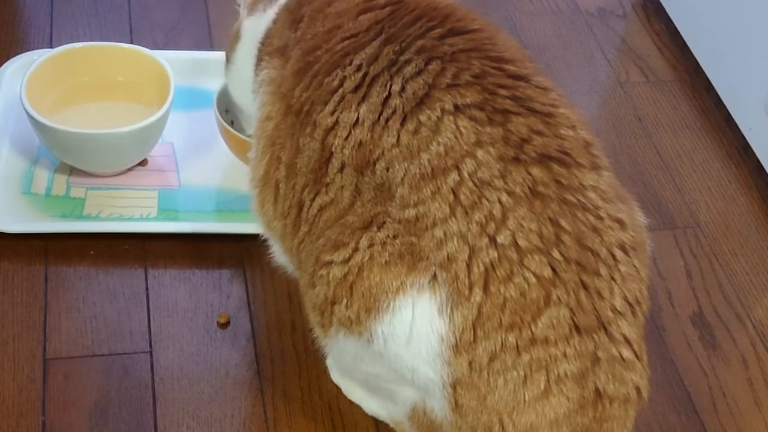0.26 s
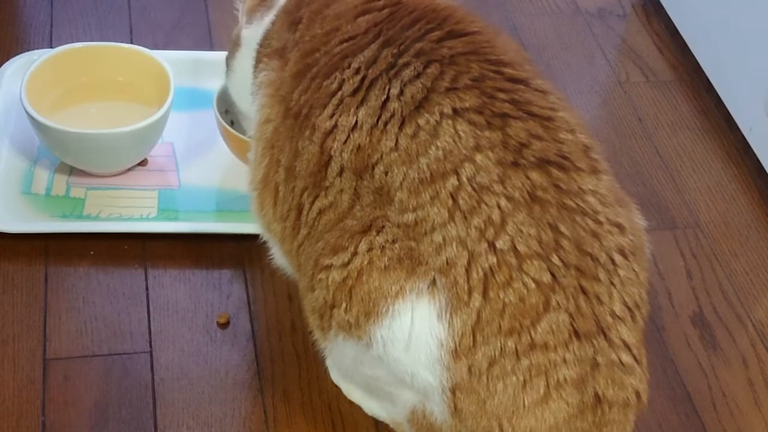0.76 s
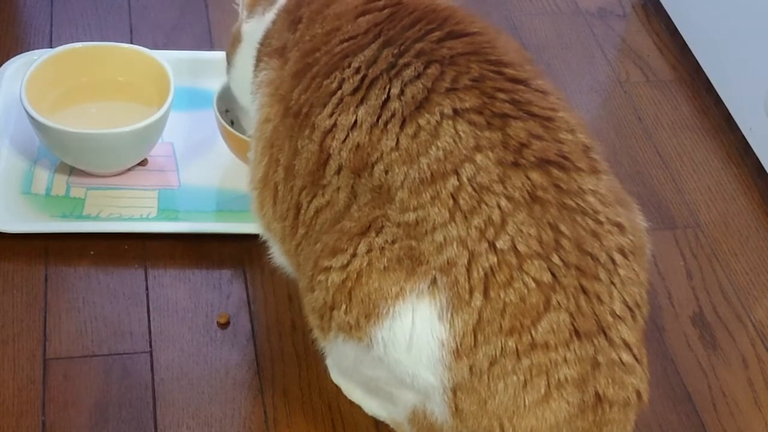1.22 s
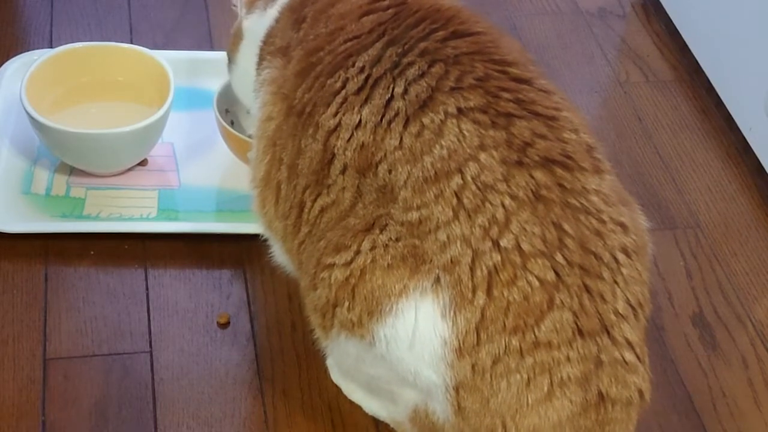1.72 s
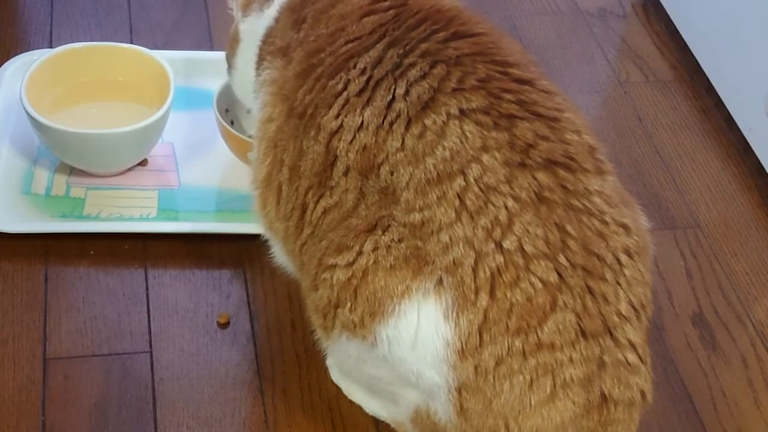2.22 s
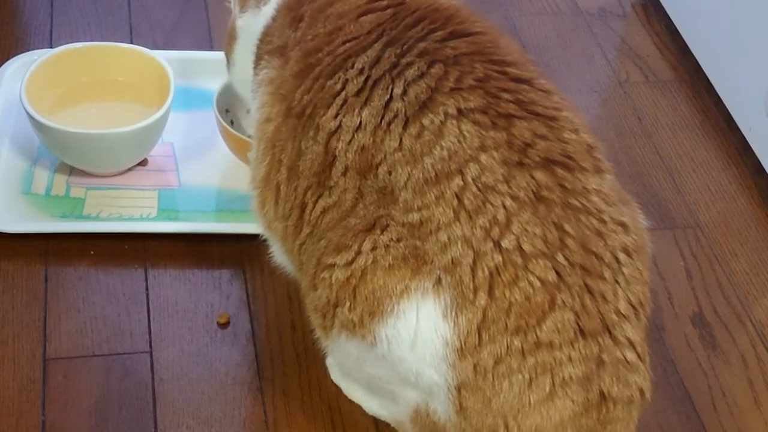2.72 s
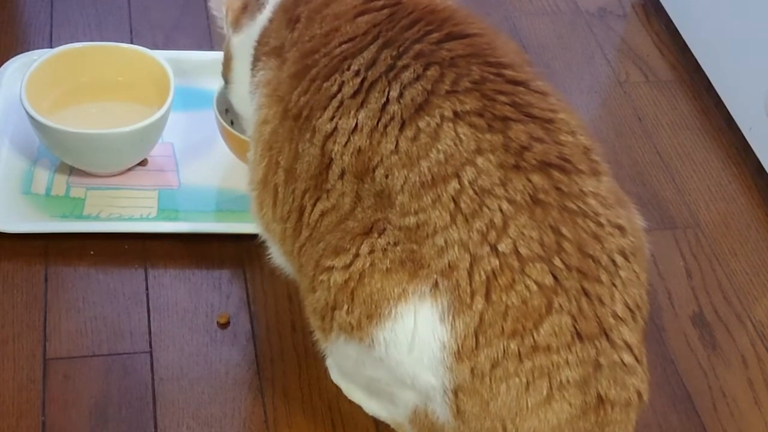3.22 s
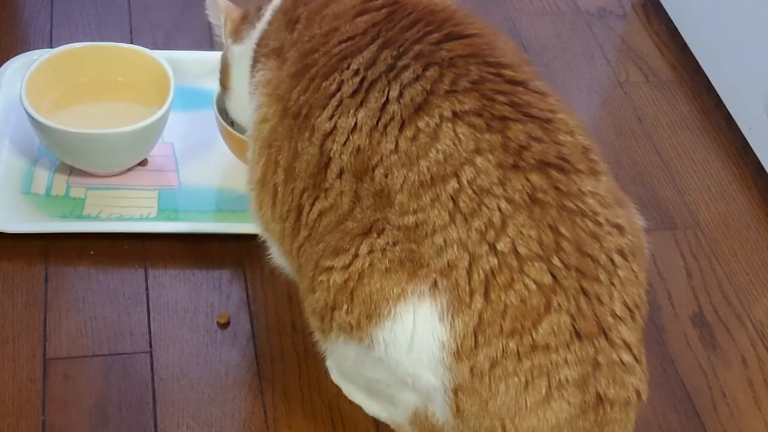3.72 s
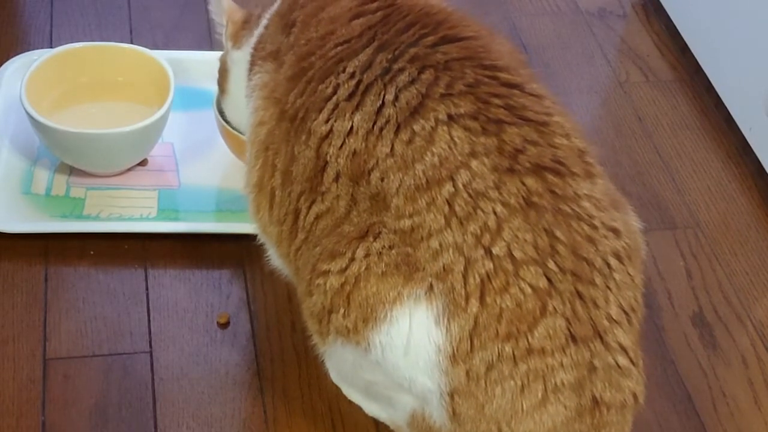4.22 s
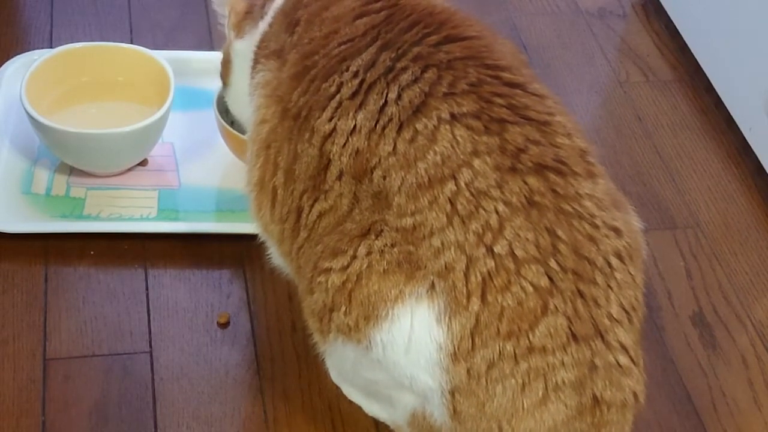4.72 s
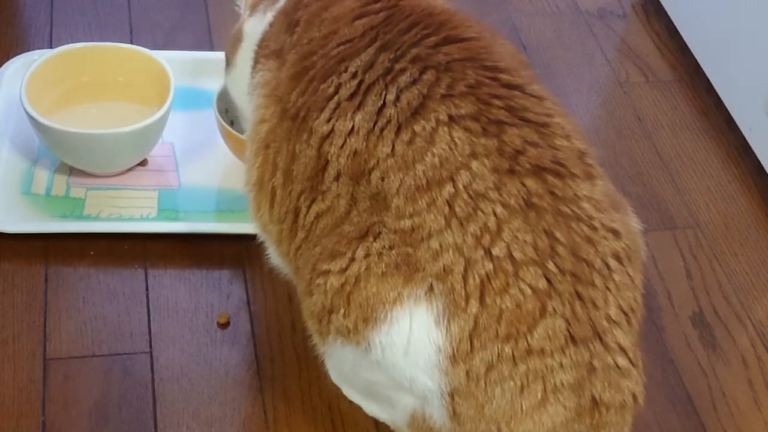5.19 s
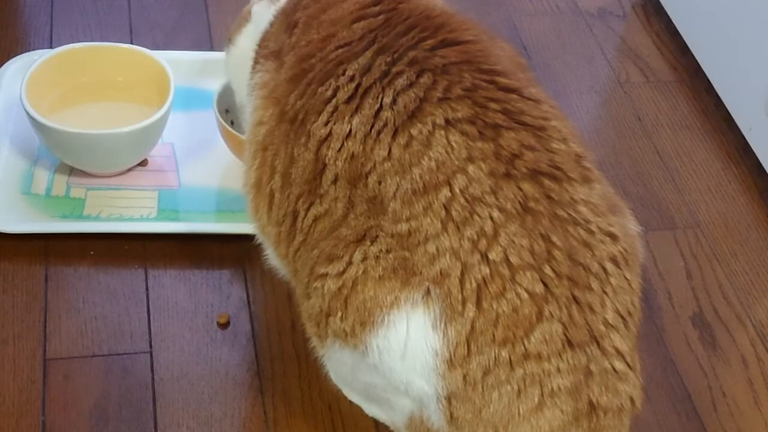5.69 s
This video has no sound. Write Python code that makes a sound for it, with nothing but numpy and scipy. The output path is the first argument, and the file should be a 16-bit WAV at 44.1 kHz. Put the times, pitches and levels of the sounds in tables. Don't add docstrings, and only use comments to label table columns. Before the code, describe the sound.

A cat eats hard pieces from a small bowl on a tray in a bare, lively room with a wooden floor. Brittle crunches, little ceramic clicks and crumb ticks come irregularly with dull tray knocks and rubbing. After about four seconds it thins out, then something drops hard and bounces quickly, followed by faint scrapes and ticks. Low mains hum and room air run beneath; close small stereo microphones.

```python
import sys
import numpy as np
from scipy import signal
from scipy.fft import rfft, irfft, next_fast_len
from scipy.io import wavfile
from scipy.ndimage import uniform_filter1d

SR = 44100
rng = np.random.default_rng(int(sys.argv[2]) if len(sys.argv) > 2 else 0)


def gain_from_decibels(decibels):
    exponent = np.asarray(decibels, float) / 20
    return 10 ** exponent


def materialize(psi):
    bounded = np.clip(np.atleast_2d(psi).T, -1, 1)
    quanta = np.round(bounded * 32767).astype(np.int16)
    wavfile.write(sys.argv[1], SR, quanta)


N = 262395
EDGES = 35 * 2 ** np.arange(0, 9.1, .5)
LEFT_LAG = 18


def rms_one(x):
    return x / np.sqrt(np.mean(x ** 2) + 1e-20)


def at_hz(points, hz):
    table_hz, value = np.array(points)[:, 0], np.array(points)[:, 1]
    return np.interp(np.log(hz), np.log(table_hz), value)


def band(x, low_hz, high_hz):
    sos = signal.butter(2, [low_hz, min(high_hz, .45 * SR)], "band", fs=SR, output="sos")
    return signal.sosfilt(sos, x + 1e-18)


def low_pass(x, hz):
    return signal.sosfilt(signal.butter(4, hz, fs=SR, output="sos"), x + 1e-18)


def resonance(x, hz, width_hz):
    r = np.exp(-np.pi * width_hz / SR)
    feedback = [1, -2 * r * np.cos(2 * np.pi * hz / SR), r * r]
    return signal.lfilter([(1 - r * r) / 2, 0, (r * r - 1) / 2], feedback, x)


def narrow(x, hz, width_hz):
    return rms_one(resonance(resonance(x, hz, width_hz), hz, width_hz))


def drift(rate):
    return np.interp(np.arange(N) * rate / SR, np.arange(200), rng.standard_normal(200))


def alike_pair(mid, side, hz):
    # (frequency [Hz], correlation [0-1])
    likeness = [(60, 0.77), (250, 0.69), (500, 0.6), (1000, 0.031), (4000, 0.074), (12000, 0.029)]
    # (frequency [Hz], left over right [dB])
    left_over_right = [(60, 3), (250, -1.5), (600, -4.5), (1300, -0.5), (2500, 6.5), (5000, 0.5),
                       (12000, 3.5)]
    alike = np.clip(at_hz(likeness, hz), 0, 1)
    lean_db = at_hz(left_over_right, hz) / 2
    shared, apart = np.sqrt(1 + alike) * mid, np.sqrt(1 - alike) * side
    return np.array([shared + apart, shared - apart]) * gain_from_decibels(np.array([[lean_db], [-lean_db]]))


def air():
    # (frequency [Hz], density [dB per Hz])
    air_colour = [(35, -7.5), (60, -4), (105, 7), (160, -16), (250, -9.5), (620, -12), (820, -29),
                  (1300, -41.5), (2200, -30.5), (3000, -22), (4800, -35), (6300, -49.5), (7800, -52),
                  (15500, -51.5)]
    # (frequency [Hz], width [Hz], level [dB])
    rumble_peaks = [(59, 4.1, -74.5), (107, 3.1, -72), (237.2, 12, -76.5)]
    air_db, patchy_db = -60, 2.2
    hum_hz, hum_db = 59.2, -61.5
    white, hiss = rng.standard_normal((2, 2, N)), 0
    for k, (low, high) in enumerate(zip(EDGES, EDGES[1:])):
        hz = np.sqrt(low * high)
        level = gain_from_decibels(at_hz(air_colour, hz) + patchy_db * drift(3.2))
        hiss = hiss + level * alike_pair(*band(white[k % 2], low, high), hz)
    rumble = sum(gain_from_decibels(db) * narrow(white[0, 0], hz, width) for hz, width, db in rumble_peaks)
    hum = gain_from_decibels(hum_db + 1.8 * drift(9.4)) * np.sin(2 * np.pi * hum_hz * np.arange(N) / SR)
    return gain_from_decibels(air_db - 6.0) * rms_one(hiss) + rumble + hum


def rubbing():
    # (time [s], level [dB])
    effort_curve = [(0.0, -75), (0.4, -60.5), (1.29, -53.5), (1.66, -62), (2.8, -58), (2.98, -45),
                    (3.45, -60), (3.66, -49), (3.98, -61.5), (4.46, -73.5), (4.72, -54.5), (5.19, -69.5),
                    (5.68, -75.5), (5.95, -63.5)]
    # (time [s], strength [dB], half length [s], boards over tray [dB])
    tray_shoves = [(.43, -40, 0.18, -23.5), (1.13, -44, 0.079, -42), (1.46, -50, 0.1, -34),
                   (2.4, -62.5, 0.32, -7.5), (2.95, -38.5, 0.057, -23), (3.456, -45.5, 0.025, -6.5),
                   (3.61, -38.5, 0.21, -14), (3.728, -51.5, 0.047, 9), (3.792, -37.5, 0.05, -7),
                   (4.94, -50, 0.15, -30), (5.88, -82, 0.047, -1)]
    mean_db = -59.5
    boards_db, tray_db, food_db, wet_shove_db = -6.5, 9, -7.5, -20.5
    boards_follow, food_follows = 0.93, 0.25
    t = np.arange(N) / SR
    effort_db = np.interp(t, *np.transpose(effort_curve)) - mean_db
    shoves, deep_shoves = 0, 0
    for s, db, half_s, low_db in tray_shoves:
        swell = gain_from_decibels(db) * np.clip(1 - np.abs(t - s) / half_s, 0, 1) ** 2
        shoves = shoves + swell
        deep_shoves = deep_shoves + swell * gain_from_decibels(low_db)
    boards = gain_from_decibels(mean_db + boards_db + boards_follow * effort_db) + deep_shoves
    tray = gain_from_decibels(mean_db + tray_db + effort_db) + shoves
    food = gain_from_decibels(mean_db + food_db + food_follows * effort_db) + gain_from_decibels(wet_shove_db) * shoves

    sizes = gain_from_decibels(2.7 * np.minimum(rng.exponential(1, (2, N)), [[2], [4]])) * rng.choice([-1, 1], (2, N))
    chance = np.array([[250], [900]]) * gain_from_decibels(4 * drift(25)) / SR
    slips, grains = sizes * (rng.random((2, N)) < chance)
    return (boards * gain_from_decibels(-0.5) * rms_one(band(slips, 69, 200))
            + tray * gain_from_decibels(-14.5) * rms_one(band(slips, 160, 1200))
            + food * gain_from_decibels(-5.5) * rms_one(band(grains, 1200, 9000)))


def slides():
    # (time [s], length [s], pitch [Hz], width [Hz], level [dB])
    singing_slides = [(1.132, 0.02, 1350, 300, -42), (1.144, 0.035, 1500, 280, -38),
                      (4.647, 0.049, 12000, 200, -65), (4.83, .07, 640, 170, -44),
                      (4.9, .06, 660, 170, -48), (4.856, 0.11, 1300, 1600, -49),
                      (5.085, .09, 2500, 400, -73), (5.175, 0.13, 2600, 450, -62),
                      (5.3, .1, 2550, 400, -65), (5.175, 0.11, 3450, 280, -66),
                      (5.175, 0.11, 4700, 2000, -57), (5.302, .04, 5300, 1000, -57),
                      (5.703, .075, 453, 35, -49.5), (5.74, 0.026, 398, 36, -48),
                      (5.78, 0.073, 367.5, 30, -52), (5.755, 0.093, 523, 23, -51),
                      (5.72, 0.06, 705, 39, -54)]
    sag = 0.97
    size = SR // 4
    out = np.zeros(N + SR)
    for s, length, hz, width_hz, db in singing_slides:
        slips = rng.standard_normal(size) ** 3
        along = np.arange(size) / SR / length
        stroke = np.clip(along * 12, 0, 1) * np.clip((1 - along) * 4, 0, 1)
        first, last = narrow(slips, hz, width_hz), narrow(slips, hz * sag, width_hz)
        out[round(s * SR):][:size] += gain_from_decibels(db) * stroke * (first * (1 - along) + last * along)
    return out[:N]


def knocks():
    # (time [s], peak [dB], ring [Hz])
    dull_knocks = [(0.258, -23.5, 334), (0.313, -39, 289), (0.468, -18, 381), (0.577, -63, 410),
                   (0.895, -47, 373), (1.026, -14.5, 355), (1.245, -55, 420), (1.349, -30, 436),
                   (1.958, -34.5, 116), (2.099, -49, 452), (2.357, -39, 114), (2.739, -35, 104),
                   (3.014, -31, 99.6), (3.07, -37, 101.5), (3.433, -18, 490), (3.572, -30.5, 101),
                   (3.705, -38.5, 116), (3.77, -38, 171), (4.127, -49, 121.3), (3.459, -28, 150),
                   (4.674, -34.5, 101), (0.599, -40, 112), (4.418, -31, 73.4), (4.856, -25, 246)]
    out, t = np.zeros(N + 8192), np.arange(8192) / SR
    for s, db, hz in dull_knocks:
        ring = np.sin(2 * np.pi * hz * t) * np.exp(-t * hz / 3.0)
        out[round(s * SR):][:8192] += gain_from_decibels(db - 16.0) * ring
    return out[:N]


def heavy_drop():
    # (time [s], level [dB])
    blows = [
        (4.4854, -16.5),
        (4.5035, -20.5),
        (4.528, -25),
    ]
    # (frequency [Hz], level [dB], t60 [s])
    board_modes = [(59.4, -2.5, 0.39), (85, 7.5, 0.14), (158, -9.5, 0.14), (200.7, -7.5, 0.042),
                   (226.4, -9.5, 0.2), (306, -14.5, .2), (401, -23, 0.14), (555, -11, 0.027),
                   (696, -16, 0.33)]
    out = 0
    for s, blow_db in blows:
        t = np.maximum(np.arange(N) / SR - s, 0)
        onset = 1 - np.exp(-t / 0.00061)
        for (hz, db, t60), lean_db in zip(board_modes, rng.normal(0, 1.3, len(board_modes))):
            level = gain_from_decibels(blow_db + db - 60 * t / t60 + lean_db * np.array([[1], [-1]]))
            out = out + level * np.sin(2 * np.pi * hz * t) * onset
    return out


def contacts():
    # (time [s], strength [dB], sharpness [dB], weight
    # on the tray [dB], ring [Hz])
    crunches = [(0.3146, -40, -13, -5.5, 2000), (0.6739, -35, -7, -15, 3180), (0.826, -50, -13, -6, 3280),
                (0.9858, -46.5, -16, -2, 2280), (1.0254, -36.5, -11.5, -2, 1630),
                (1.1308, -46.5, -9, -9, 1210), (1.2468, -34.5, -9, -9.5, 2380),
                (1.269, -36, -4.5, -8, 2300), (1.6505, -41, -6, -12.5, 2080), (2.146, -37.5, -16, -7, 2450),
                (2.172, -37.5, -1, -34, 1950), (2.443, -41.5, -13.5, -8.5, 2430),
                (2.5197, -31, -4, -13.5, 2260), (2.7485, -42.5, -12.5, -4.5, 2220),
                (2.8322, -38, -4.5, -7.5, 2250), (2.9774, -32.5, -18, -6.5, 1830),
                (3.122, -43.5, -13, -3, 2000), (3.2002, -39.5, -9.5, -10, 1580),
                (3.4219, -40.5, -11, 4.5, 2270), (3.4366, -34, -10.5, -0.5, 1910),
                (3.6418, -38.5, -10, -8.5, 2180), (4.4849, -13.5, -17.5, -6, 2335),
                (5.1765, -56, -8.5, -23.5, 2810), (5.3044, -60.5, 2.5, -17, 2520)]
    # (time [s], strength [dB], weight on the tray [dB], ring [Hz])
    nudges = [(0.2585, -46.5, -5.5, 1700), (0.4766, -53.5, -31, 1360), (0.5805, -45.5, 3, 1940),
              (0.8899, -48, 2.7, 1820), (0.9298, -53.5, 3.5, 1690), (1.1475, -59, -20, 1390),
              (1.3507, -41, 1.5, 1670), (1.48, -49.5, 3.5, 1400), (1.8715, -53.5, -2.5, 1850),
              (1.952, -54, 3.5, 1780), (2.0481, -49, 0.5, 1860), (2.0655, -48, 2.5, 1830),
              (2.0835, -47, -5, 1830), (2.1037, -44, 0.5, 1300), (2.3645, -64, 14, 1820),
              (2.463, -46, -27, 2400), (2.4862, -43, -5, 1900), (2.7342, -54, 4.5, 1870),
              (2.94, -61, -5, 1230), (3.071, -51.5, 7, 1080), (3.2821, -47.5, -5.5, 2500),
              (3.405, -52.5, 3.5, 1930), (3.5667, -43, 5, 1840), (3.614, -49, -20, 1170),
              (3.6965, -43, 0, 1870), (3.714, -41.5, 1, 1600), (3.7905, -41, 1.5, 1850),
              (3.8763, -53.5, 0, 2190)]
    # (time [s], strength [dB], weight on the tray [dB], ring [Hz])
    stirs = [
        (4.2141, -65, 5.5, 4070),
        (4.445, -52.5, 1, 2250),
        (4.8313, -53.5, 9.5, 1510),
        (4.8533, -50, 10.5, 963),
        (4.903, -62, 11, 1270),
        (5.091, -62, -17, 2500),
        (5.7097, -56.5, -2, 2620),
        (5.7486, -50.5, 2, 3140),
        (5.9205, -64.5, 8.5, 2660),
    ]
    dull_db = -21.5
    soft = [(s, db, dull_db, weight_db, hz) for s, db, weight_db, hz in list(nudges) + list(stirs)]
    return np.transpose(list(crunches) + soft)


def splinters(times, levels_db, low_hz, high_hz, ragged):
    clicks = np.zeros(N + 256)
    fade = np.exp(-np.arange(255) / 90)
    for s, db, trail in zip(times, levels_db, rng.standard_normal((len(times), 256))):
        clicks[round(s * SR):][:256] += gain_from_decibels(db) * np.r_[1, ragged * trail[1:] ** 3 * fade]
    return band(clicks[:N], low_hz, high_hz) * np.sqrt(SR / (high_hz - low_hz))


def crumbs():
    count, crumble_s = 6, 0.043
    crumb_db, spread_db = -17.5, 5
    clean_break = .4
    s, db, sharp_db, *_ = contacts()
    draws = rng.random((len(s), 2, count))
    delay, luck = draws[:, 0], draws[:, 1]
    times = np.minimum(s[:, None] + 0.0043 + crumble_s * delay ** 1.3, N / SR).ravel()
    levels_db = (db - clean_break * (sharp_db + 14))[:, None] + crumb_db
    levels_db = levels_db + spread_db * np.log(luck + .01) - 8 * delay
    bright_db = levels_db + sharp_db[:, None]
    return (gain_from_decibels(25.0) * splinters(times, levels_db.ravel(), low_hz=915, high_hz=4120, ragged=0.0077)
            - gain_from_decibels(20.0) * splinters(times, bright_db.ravel(), low_hz=4270, high_hz=7000, ragged=.02))


def bite_rings():
    out, t = np.zeros(N + 2048), np.arange(2048) / SR
    for s, crack_db, *_, hz in contacts().T:
        out[round(s * SR):][:2048] += gain_from_decibels(crack_db - 4.5) * np.sin(2 * np.pi * hz * t) * np.exp(-t / .009)
    return out[:N]


def bites():
    s, db, sharp_db, weight_db, hz = contacts()
    clack_db = db - 6.5 - 17 * np.log2(hz / 2000)
    sizzle_db = db - 12.5 + 1.185 * sharp_db
    top_db = sizzle_db - 18 + .5 * (sharp_db + 3)
    crack = gain_from_decibels(20.5) * splinters(s, db, low_hz=1500, high_hz=4500, ragged=0.013)
    push = gain_from_decibels(24.0) * splinters(s, db + weight_db, low_hz=203, high_hz=650, ragged=0.0068)
    clack = gain_from_decibels(23.5) * splinters(s, clack_db, low_hz=740, high_hz=1618, ragged=0.011)
    edge = gain_from_decibels(28.0) * splinters(s, db + sharp_db, low_hz=4970, high_hz=7270, ragged=.02)
    sizzle = gain_from_decibels(39.5) * splinters(s, sizzle_db, low_hz=7010, high_hz=13600, ragged=0.021)
    top = gain_from_decibels(51.0) * splinters(s, top_db, low_hz=12800, high_hz=16500, ragged=.02)
    return crack + push - clack - edge + sizzle - top


def bowl(x, ring_db):
    # (frequency [Hz], width [Hz], level [dB])
    bowl_modes = [(401, 37, 4), (1460, 23, -61.5), (1830, 53, -6), (2074, 160, -38.5), (4060, 130, -44)]
    out = x
    for k, (hz, width, db) in enumerate(bowl_modes):
        out = out + (-1) ** k * gain_from_decibels(ring_db + db) * resonance(x, hz, width)
    return out


def room(x, rings, early_t60, rise_s):
    # (frequency [Hz], t60 [s])
    tail_decay = [(60, 0.67), (250, 0.45), (1000, 0.38), (3000, 0.35), (6000, 0.31), (12000, 0.33)]
    # (frequency [Hz], early sound over the tail [dB])
    early_over_tail = [(60, 11), (400, 10.5), (1000, -4.5), (2000, 19.5), (3000, 14), (5000, 13),
                       (12000, 13.5)]
    places = 5
    t, soon = np.arange(SR // 2 + 4000) / SR, np.arange(6000) / SR
    white = rng.standard_normal((2, 2, len(t)))
    close = rng.standard_normal((2, places, 1, 6000))
    early, late = 0, 0
    for k, (low, high) in enumerate(zip(EDGES, EDGES[1:])):
        hz = np.sqrt(low * high)
        fall = gain_from_decibels(at_hz(early_over_tail, hz) - 60 * soon / (early_t60 + 9 / hz))
        near = close[k % 2] * fall * (1 - np.exp(-soon / .002))
        near = near * alike_pair(np.ones(1), 0, hz)
        lag = int(LEFT_LAG * min(hz / 1500, 1) ** 2)
        near[:, 0] = np.roll(near[:, 0], lag, axis=-1)
        tail = alike_pair(*white[k % 2], hz) * gain_from_decibels(-60 * t / at_hz(tail_decay, hz))
        tail = tail * (1 - np.exp(-t / rise_s))
        early, late = early + band(near, low, high), late + band(tail, low, high)
    place = np.repeat(rng.integers(0, places, N // 1500 + 1), 1500)[:N]
    heard = signal.fftconvolve((x + 0.39 * rings)[None], late, axes=1)[:, :N]
    for k in range(places):
        share = uniform_filter1d(1. * (place == k), size=300)
        heard += signal.oaconvolve((share * (x + rings))[None], early[k], axes=1)[:, :N]
    return heard / np.sqrt(np.sum(late ** 2))


def microphone(x):
    # (frequency [Hz], level [dB])
    mic_response = [(25, -39), (38, -23.5), (52, -6), (65, -3), (4000, -3.5), (5500, -9), (6600, -18.5),
                    (7000, -32.5), (7400, -38.5), (8000, -22), (10000, -15.5), (13000, -31), (15700, -21),
                    (15950, -41.5)]
    size = 2 * next_fast_len(N // 2 + 4096)
    hz = np.arange(1, size // 2 + 2) * SR / size
    cepstrum = irfft(np.log(gain_from_decibels(at_hz(mic_response, hz))), size)
    cepstrum[1:size // 2] *= 2
    cepstrum[size // 2 + 1:] = 0
    return irfft(rfft(x, size) * np.exp(rfft(cepstrum)), size)[:, :N]


def scene():
    sliding, knocking = slides(), knocks()
    touches = bowl(bites() + crumbs() + rubbing(), ring_db=-3.0) + knocking + 0.39 * sliding
    beamed = bite_rings() + 1.08 * sliding
    in_room = room(touches, beamed, early_t60=0.031, rise_s=.004)
    along_boards = gain_from_decibels(1) * low_pass(knocking, hz=150)
    straight = gain_from_decibels(-6) * np.array([np.roll(sliding, LEFT_LAG), sliding])
    return microphone(in_room + heavy_drop() + along_boards + straight) + air()


def top_cut(x):
    return signal.sosfilt(signal.butter(12, 16460, fs=SR, output="sos"), x)


def record(dry):
    return top_cut(dry)


dry = scene()
out = record(dry)
materialize(out)
```